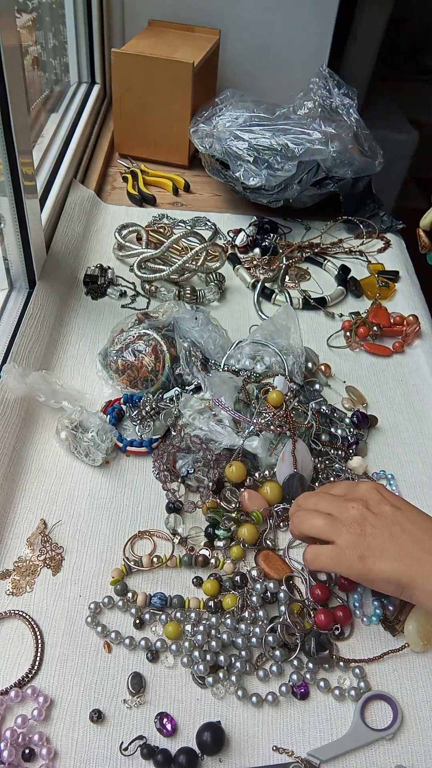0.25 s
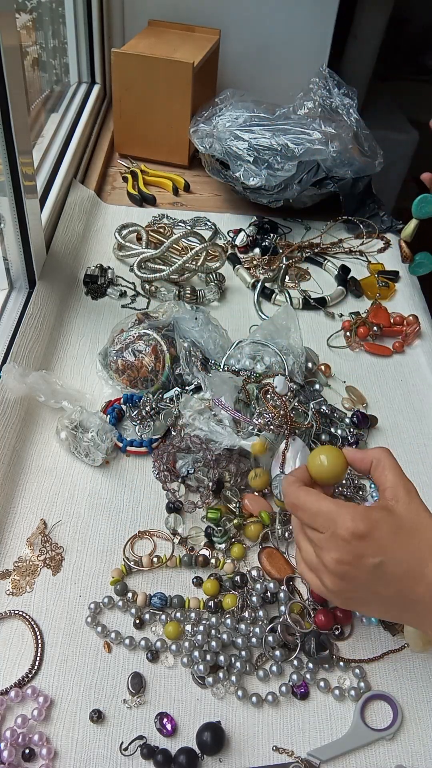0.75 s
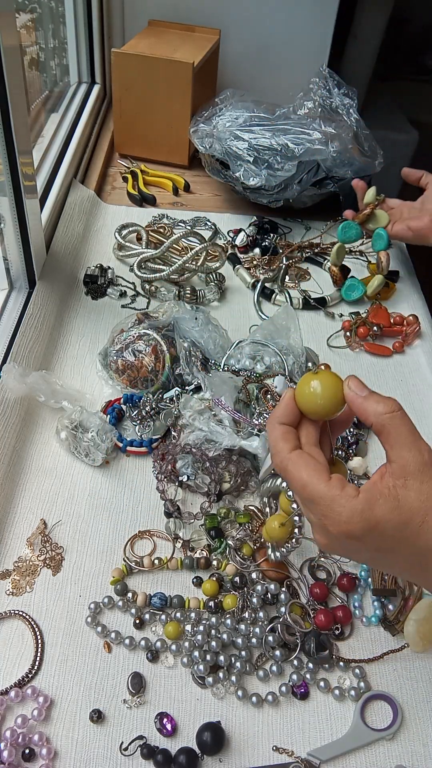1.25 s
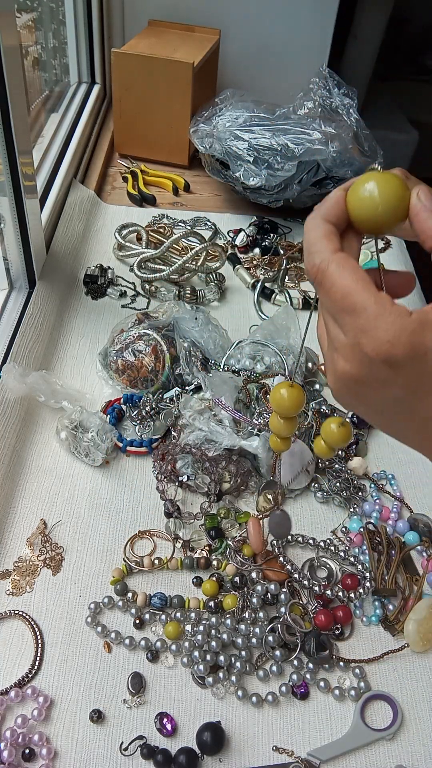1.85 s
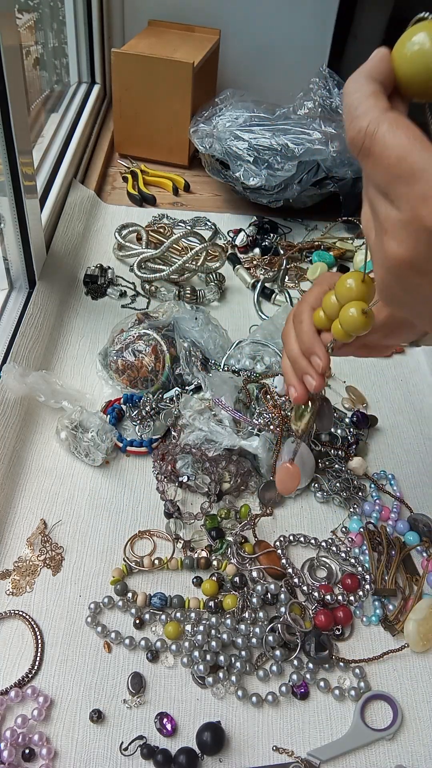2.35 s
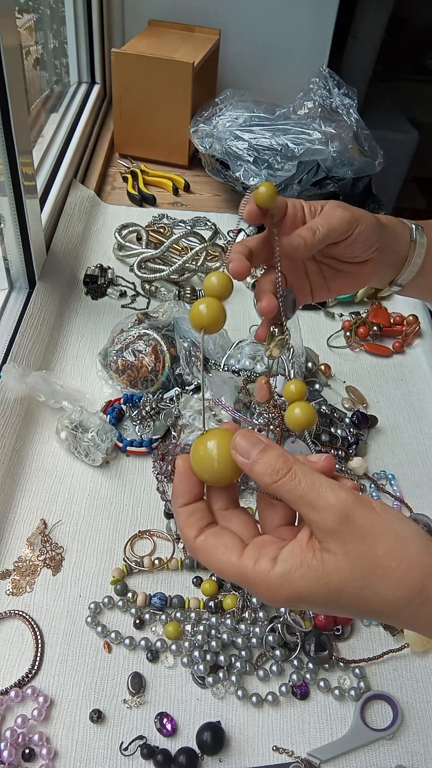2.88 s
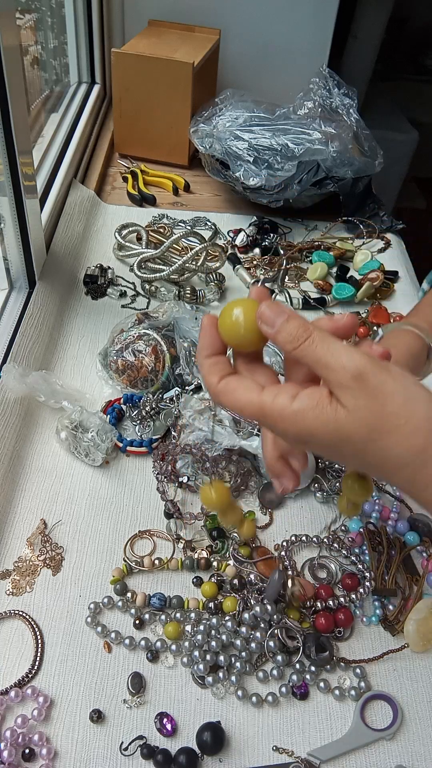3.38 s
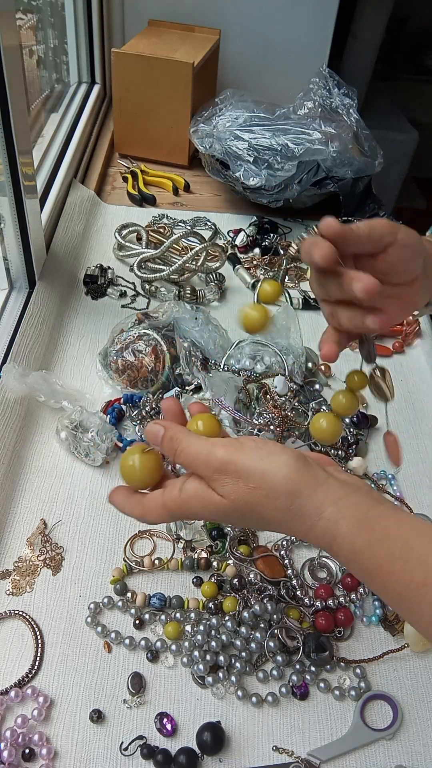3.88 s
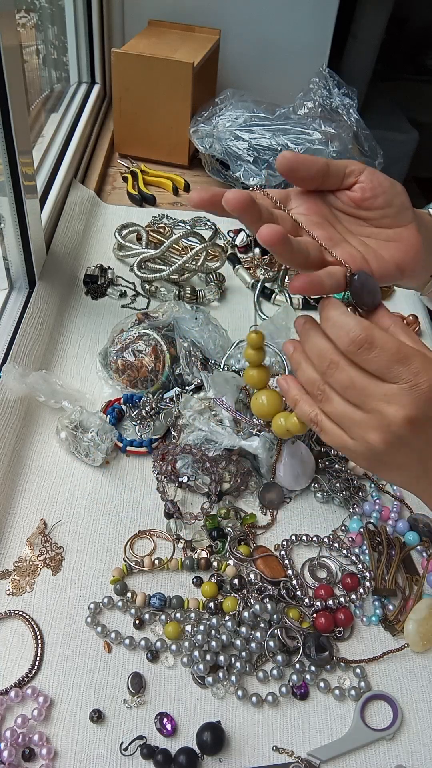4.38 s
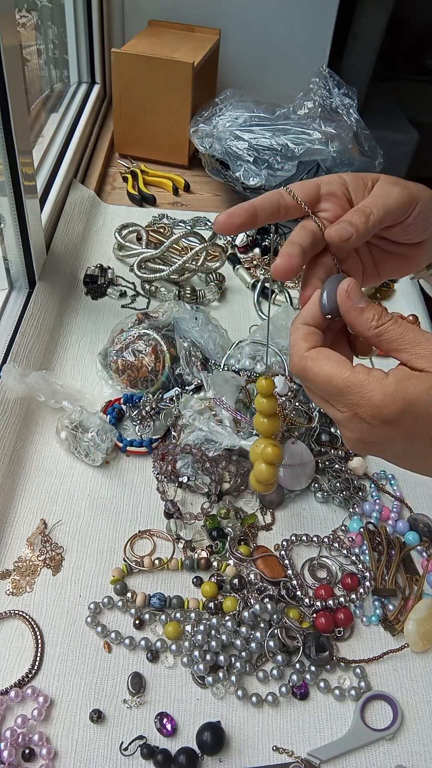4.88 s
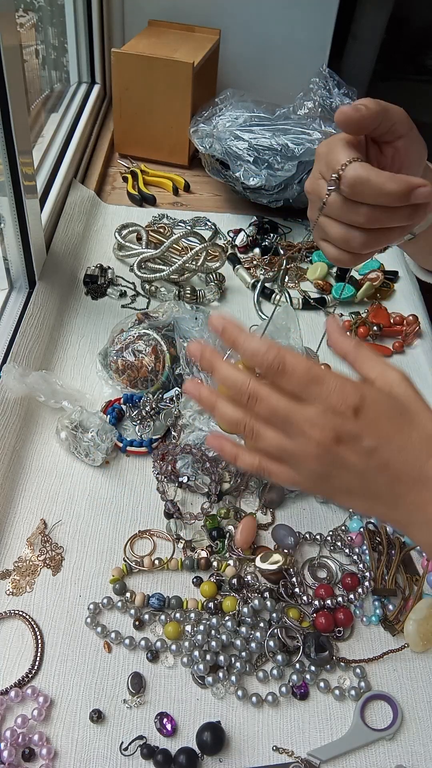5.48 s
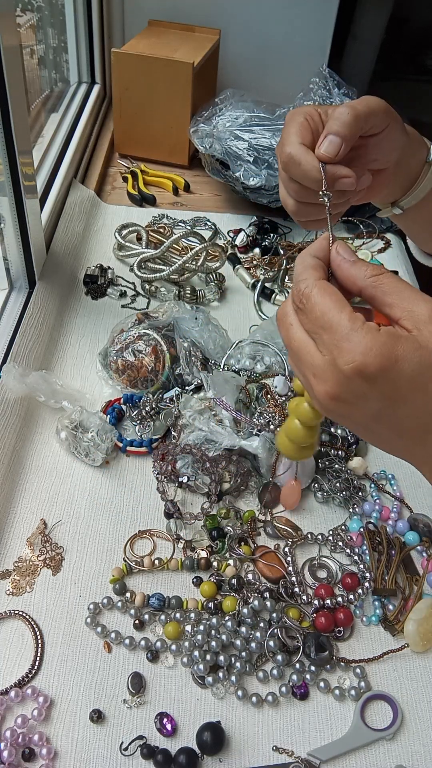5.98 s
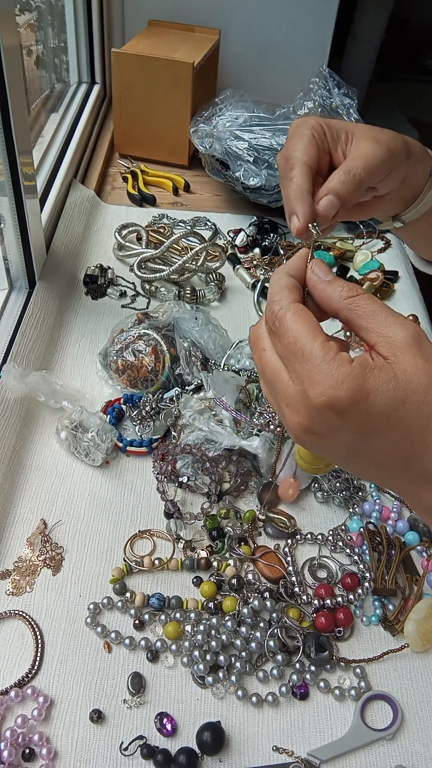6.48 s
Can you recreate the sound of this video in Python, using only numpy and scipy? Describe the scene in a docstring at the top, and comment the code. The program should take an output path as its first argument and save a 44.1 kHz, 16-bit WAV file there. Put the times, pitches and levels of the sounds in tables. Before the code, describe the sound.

Heavy beads and thin chains are handled above a cloth-covered table. After a hushed start and soft thuds, they rattle thickly for about a second, then fall nearly silent. Sharp bright clacks return in three separate bursts, with light ticks between. The sound is close and fairly dry, with short room tails and very faint, noise-suppressed background.

```python
"""A small room with a cloth-covered table: close to a phone, a hand lifts a bead necklace out of jewellery.
Beads click as short sine rings with a noise crack and a treble snap; chains slither as dense link ticks.
Heavy beads knock the table top, made of noise blows that ring its modes; a faint hoot is a gliding sine.
A sparse decaying tail answers for the room, over shaped noise as room tone.
The phone's noise suppressor holds the room tone down and cuts the tails short."""
import sys
import numpy as np
from scipy import signal
from scipy.io import wavfile
from scipy.ndimage import uniform_filter1d

SR = 44100
rng = np.random.default_rng(int(sys.argv[2]) if len(sys.argv) > 2 else 0)


def transcribe(u):
    """Save the signal u as a 16-bit wav file named by the first command-line argument.

    u: samples, shape (n,) or (channels, n), limited to [-1, 1]; the rate is SR.
    q: integer samples, one column per channel.
    """
    v = np.clip(np.atleast_2d(u).T, -1, 1)
    q = np.round(v * 32767).astype(np.int16)
    wavfile.write(sys.argv[1], SR, q)


N = 297234

# clear clicks of bead on bead: (time [s], level [dB], ring pitch [Hz], treble snap against the ring [dB])
BEAD_CLICKS = [(0.612, -38, 2610, -12), (0.6519, -47, 2210, -5), (0.6945, -28, 2790, -22),
               (0.703, -22.5, 3870, -7.5), (0.7493, -31, 3850, -8), (0.8023, -31.5, 1620, -22),
               (0.8098, -24.5, 4280, -14), (0.821, -22, 4030, -13.5), (0.8608, -19.5, 3410, -18),
               (0.8711, -29.5, 3460, -7), (0.8775, -30, 3680, 0.5), (0.9044, -36.5, 3560, -13.5),
               (0.9294, -22.5, 3180, -18.5), (0.9453, -21, 2690, -15), (0.9503, -24.5, 3000, -12.5),
               (0.9624, -23.5, 3800, -15.5), (0.9971, -25.5, 3900, -10), (1.0293, -21.5, 3910, -2),
               (1.1184, -31.5, 2600, -7), (1.1273, -32, 3740, -12), (1.1637, -27.5, 3880, -10),
               (1.169, -19.5, 3350, -12), (1.2141, -35, 2470, -8.5), (1.2216, -19, 4410, -23.5),
               (1.2395, -22, 3730, -18), (1.2824, -29.5, 4300, -4.5), (1.2905, -21.5, 6290, -8),
               (1.297, -24, 6640, -25), (1.3239, -23.5, 4240, -16), (1.3326, -19.5, 4810, -9.5),
               (1.3545, -27.5, 4580, -13.5), (1.3935, -26.5, 4550, -21.5), (1.4144, -26, 4900, -25.5),
               (1.4204, -21, 4690, -31.5), (1.4635, -12, 2490, -23), (1.4758, -18, 2350, -21),
               (1.4814, -19.5, 6280, -24), (1.4874, -23.5, 5460, -21.5), (1.5261, -26.5, 1680, -19),
               (1.5615, -28.5, 3290, -16), (1.5869, -22, 2520, -29.5), (1.6593, -39.5, 2360, -17),
               (1.708, -34.5, 5140, -0.5), (1.718, -28.5, 3670, -1), (1.7308, -29, 1470, -29.5),
               (1.7639, -23, 5530, -12.5), (1.7835, -20.5, 6150, -5), (1.9708, -62.5, 4470, 1),
               (2.0805, -39, 3630, -13), (2.0887, -38, 3720, -22), (2.1545, -63, 3410, -17),
               (2.2004, -63.5, 1726, -12.5), (2.2334, -60.5, 3930, -9.5), (2.2655, -52, 3970, -9.5),
               (2.356, -46, 2160, -20.5), (2.3664, -48, 4380, -31), (2.4363, -52, 5310, -10.5),
               (2.5341, -55.5, 4510, -33), (2.5436, -45, 4480, -31.5), (2.5894, -61, 3030, -19),
               (2.6594, -70.5, 1572, -11.5), (2.7327, -31.5, 5920, -14.5), (2.7386, -37.5, 5080, -12.5),
               (2.9809, -46, 1990, -25), (3.039, -39.5, 2900, -19.5), (3.0453, -36.5, 4590, -12.5),
               (3.0785, -24.5, 3770, -12), (3.1231, -27.5, 3880, -8.5), (3.1339, -9.5, 4390, -13),
               (3.1411, -9, 5790, -21), (3.168, -14.5, 5290, -8.5), (3.1865, -14.5, 5150, -16),
               (3.196, -16.5, 3640, -11), (3.2289, -17, 6620, -10.5), (3.2718, -22, 3590, -16),
               (3.3855, -61, 2200, -7.5), (3.4135, -44.5, 6130, -12), (3.4407, -33, 5740, -19.5),
               (3.4554, -38.5, 5790, -22.5), (3.5058, -24, 4640, -23), (3.534, -34, 5620, -32),
               (3.5411, -42, 6630, -47), (3.6066, -33, 5320, -3), (3.614, -35.5, 6600, -20),
               (3.6413, -45.5, 4260, -19), (3.675, -38, 5670, -18), (3.7907, -45.5, 3080, -30),
               (3.7978, -44.5, 3380, -26), (3.809, -44, 3250, -17.5), (3.8172, -26.5, 4820, -12),
               (3.8282, -27.5, 5310, -14.5), (3.8437, -24, 4730, -20.5), (3.8594, -37, 2980, -8.5),
               (3.8831, -46.5, 3210, -21), (3.9415, -32, 4330, -20.5), (3.9552, -30.5, 4330, -9),
               (3.9747, -34, 4370, -9), (3.9894, -37.5, 4540, -17.5), (4.0878, -23, 3740, -39.5),
               (4.1128, -26, 3250, -36.5), (4.123, -24.5, 4150, -37), (4.1687, -26, 2890, -38),
               (4.1762, -26, 5500, -28), (4.1876, -12.5, 5400, -22), (4.1938, -19.5, 3930, -24.5),
               (4.2158, -17.5, 3160, -43), (4.2322, -32.5, 3290, -10), (4.2627, -23, 4300, -19.5),
               (4.2697, -26.5, 4480, -18), (4.342, -21.5, 4600, -31), (4.3524, -30.5, 4940, -32.5),
               (4.3861, -34.5, 4930, -36), (4.3939, -30.5, 5560, -38.5), (4.4711, -51.5, 3930, -6.5),
               (4.5269, -53.5, 3750, -14), (4.6674, -52.5, 5270, -3.5), (4.6945, -50.5, 3430, -12),
               (4.7107, -44, 4410, -10), (4.7284, -39, 3940, -7.5), (4.7613, -40.5, 3590, -23.5),
               (4.8675, -53, 3790, -25), (4.9001, -51, 2880, -23), (4.91, -45.5, 3580, -23),
               (5.0595, -59, 6050, -20), (5.4336, -13, 2480, -18.5), (5.4477, -32, 2620, -11.5),
               (5.4523, -12, 4900, -22.5), (5.459, -9.5, 4640, -23), (5.47, -21, 4300, -5),
               (5.4733, -17, 6000, -17), (5.4964, -21, 4910, -8), (5.5339, -25.5, 5070, -18.5),
               (5.5594, -26.5, 1460, -21), (5.5957, -40, 4630, -15.5), (5.6134, -43, 3590, -27),
               (5.6484, -46.5, 2185, -32), (5.6994, -45, 3480, -7), (5.7071, -20, 4010, -18.5),
               (5.7148, -39, 3530, -19.5), (5.7491, -48.5, 4610, -7.5), (5.7703, -20, 6850, -8.5),
               (5.7772, -24, 4510, -4), (5.7828, -23, 5070, -17.5), (5.7916, -28, 3800, -14),
               (5.8709, -46, 3750, -21), (6.001, -38.5, 3430, -11.5), (6.0051, -30.5, 3820, -10.5),
               (6.0428, -52, 3930, -18), (6.133, -37, 3850, -9), (6.1509, -34.5, 6860, -3.5),
               (6.1593, -39, 6170, -16), (6.1684, -39.5, 7060, -20), (6.2205, -43, 2920, -22),
               (6.2332, -41, 3500, -26.5), (6.273, -37.5, 3600, -27), (6.2821, -46.5, 5680, -29.5),
               (6.3654, -43, 5680, -16), (6.4954, -51, 3410, -19.5), (6.5384, -30, 3870, -8.5),
               (6.6774, -64, 5110, -1), (6.7242, -41, 4030, -21.5)]
# spectrum of a click's crack: (frequency [Hz], gain [dB])
CRACK_COLOUR = [(900, -49), (1350, -13), (1700, -7.5), (2500, -4.5), (4000, -2.5), (6000, -3.5), (8000, -8),
                (10000, -37.5), (12000, -62.5)]
# spectrum of its treble snap: (frequency [Hz], gain [dB])
SNAP_COLOUR = [(6500, -33.5), (7900, -9.5), (8900, 10.5), (9900, 1.5), (11000, -1), (12000, -13.5),
               (13000, -46.5)]
# spectrum of its very top: (frequency [Hz], gain [dB])
AIR_COLOUR = [(10000, -30), (11500, -8.5), (13000, -7.5), (14200, -7), (15200, 2), (16000, -18.5),
              (16800, -34)]
# modes of a hard pendant that bright clicks set ringing: (frequency [Hz], level [dB], t60 [s])
PENDANT_MODES = [(3800, -2, 0.078), (1910, -12.5, 0.066), (5750, -15.5, .04), (8460, 1.5, 0.04),
                 (11100, -18.5, .03), (15000, -2, .04)]
# the hand digs in the heap: (time [s], sliding level [dB], its treble level [dB], level passed to the table [dB])
DIGGING = [(0.405, -74.5, -79.5, -75), (0.42, -63, -87.5, -58), (0.56, -63.5, -78.5, -58),
           (0.61, -63.5, -71.5, -60), (0.685, -53.5, -63, -60), (0.776, -53.5, -60.5, -63),
           (0.836, -55, -61.5, -60), (0.89, -45.5, -60, -60), (1.124, -56, -60.5, -64),
           (1.24, -51, -56, -60), (1.376, -64.5, -66, -62), (1.436, -54, -54.5, -60),
           (1.546, -47.5, -55.5, -58), (1.636, -62.5, -69.5, -66), (1.7, -62.5, -70.5, -70),
           (1.826, -74, -88, -75), (1.95, -84, -80.5, -90)]
# single chain slides or swings: (start [s], length [s], top level [dB], top level of the treble [dB])
CHAIN_SLIDES = [(0.223, .065, -73.5, -72), (2.043, 0.42, -83.5, -91.5), (3.071, .35, -65.5, -79),
                (3.427, 0.25, -84, -88), (3.791, 0.13, -66, -81.5), (3.922, 0.13, -62, -63.5),
                (4.148, 0.2, -57.5, -65), (4.453, .12, -70, -68), (4.642, 0.17, -65.5, -67.5),
                (4.842, 0.08, -69.5, -84), (4.896, 0.053, -65.5, -73.5), (4.98, 0.17, -79.5, -86),
                (5.474, .22, -61, -77.5), (5.75, .17, -74, -93.5), (6.672, 0.059, -80.5, -76.5)]
# blows on the table top: (time [s], peak [dB], favoured pitch [Hz], hardness [dB], boom level [dB])
TABLE_KNOCKS = [(0.394, -31, 303, -27.5, -28), (0.411, -19.5, 235, -21, -32.5),
                (0.427, -25.5, 373, -15.5, -42.5), (0.457, -31, 360, -12, -30.5),
                (0.8, -31, 383, -10.5, -42.5), (0.865, -34, 346.4, -16, -39.5),
                (0.925, -28.5, 370, 9.5, -40), (0.959, -37.5, 539, -5.5, -55.5),
                (1.166, -32, 372, -19, -67.5), (1.218, -30.5, 343, 9.5, -43), (1.31, -34, 545, 0, -50.5),
                (1.421, -31, 352, -15, -64.5), (1.462, -18.5, 1177, -11.5, -49),
                (1.524, -22.5, 786, -5, -47.5), (1.584, -38.5, 382, -5.5, -59.5),
                (1.69, -38, 363, -31.5, -61), (1.727, -35, 363, -2, -74.5), (1.779, -34.5, 370, -12, -46.5),
                (2.108, -52, 622, -19.5, -66), (2.975, -48.5, 603, -10.5, -74.5),
                (3.072, -42, 611.5, -12, -68), (3.13, -30, 890, -8, -33.5), (3.155, -22, 1020, 9.5, -47.5),
                (3.229, -38.5, 248.5, -11.5, -45), (3.608, -48.5, 359.4, -11, -59.5),
                (4.12, -49.5, 622, 5.5, -73.5), (4.264, -45, 520, -28, -61),
                (4.391, -55.5, 1040, -16, -70.5), (5.432, -22, 376, 0, -37), (5.458, -24, 384, -1.5, -33.5),
                (5.522, -33.5, 267.5, 0.5, -50), (5.557, -31, 393.3, -11.5, -54.5),
                (5.706, -36.5, 388, -10.5, -75.5), (5.789, -51.5, 492, -15, -58.5),
                (5.833, -49, 351, -27.5, -68), (6.26, -45, 301.4, -37, -59),
                (6.292, -50, 268.4, -32.5, -57), (6.321, -54.5, 298, -30, -55),
                (6.717, -53, 355, -26.5, -63)]
# modes of the table top, before each blow's own damping: (frequency [Hz], level [dB], t60 [s])
TABLE_MODES = [(236, 3, 0.88), (288, 1, 0.55), (369, 4, 0.98), (387, -6, 0.33), (483, -3, 0.2),
               (509, 1.5, 0.48), (622, 3.5, 1), (802.5, 2.5, 0.37), (944, -1, 0.11), (1170, 5.5, 0.022)]
# modes of the table frame and the room under it: (frequency [Hz], level [dB], t60 [s])
FRAME_MODES = [(62.4, -8, 0.29), (75, -10, 0.064), (101.7, -0.5, 0.29), (139, 4.5, 0.17), (152, 2, .45),
               (198, -3, 0.55)]
# spectrum that a hard blow wakes: (frequency [Hz], gain [dB])
HARD_COLOUR = [(120, -38.5), (220, -6.5), (500, 3), (1000, 1.5), (1700, 2.5), (3000, -19), (8000, -38)]
# a faint soft hoot, level before a later lift: (time [s], pitch [Hz], level [dB])
HOOT_GLIDE = [(2.172, 512, -76), (2.213, 538, -64), (2.272, 530.6, -58.5), (2.34, 528, -85.5)]
# decay of the room: (frequency [Hz], t60 [s])
ROOM_DECAY = [(100, 0.47), (300, 0.49), (800, 0.46), (2000, 0.21), (5500, 0.18), (10000, 0.14),
              (15000, 0.12)]
# spectrum of the room tone: (frequency [Hz], relative density [dB per Hz])
TONE_COLOUR = [(12, -44.5), (20, -25), (32, -35.5), (52, -16), (102, 2.5), (124, -8.5), (273, -20),
               (351, -20.5), (1020, -25.5), (1840, -31.5), (2180, -32), (2510, -32), (7510, -42),
               (15200, -58), (16500, -57.5)]
# one faint narrow drone in the room tone: (frequency [Hz], width [Hz], rise [dB])
TONE_DRONE = (622, 11, 13)

# room share of a -31 dB click [dB]; louder clicks are nearer and drier [dB per dB]
CLICK_ROOM_DB, NEARER_PER_DB = -4.0, 0.1266
# light touches of hanging beads ring longer [dB of time per dB below the threshold]
RING_T60_S, FREE_BELOW_DB, FREE_RINGS = .006, -38.0, .6
# number of chance clicks; least height over the sliding chains and its spread
SMALL_CLICKS, SMALL_OVER_DB, SMALL_SPREAD_DB = 340, 12.5, 4.5
# their pitch range; snap of the brightest against the treble share of the sliding
SMALL_HZ, SMALL_TREBLE_DB = (2020, 6000), -4.5
# a slide swells early and dies slowly (exponents); share of it that reaches the table
SLIDE_SKEW, SLIDE_POINT, SLIDE_TABLE_DB = 0.77, 2.2, -13.0
# the lifted necklace never hangs quite still
DANGLE_DB, DANGLE_TREBLE_DB, DANGLE_FROM_S = -91, -89, 1.9
# link rings against link cracks: freer in the air than in the heap
DIG_JINGLE_DB, HANG_JINGLE_DB = -5.0, 1.0
# decay time of a blow of hardness -13.5 dB; softer blows last longer [dB of time per dB]
RATTLE_MS, SOFT_SLOWS = 3.5, 0.22
# ring of a -30.5 dB blow; a heavier bead rests on the top and damps it [dB of time per dB]
KNOCK_T60_S, HEAVY_DAMPS = .065, 0.22
# a short hard blow hardly wakes the frame below this pitch [dB an octave per dB of hardness]
DEEP_HZ, HARD_SKIPS = 100, 0.7
# room tone level after full suppression, deepest suppression, upper band limit
TONE_DB, SUPPRESS_DB, EDGE_HZ = -69, 9, 16750


def clicks(rows):
    """Bead clicks: contact noise cracks, the bead rings briefly, treble snaps; returns near and far sound."""
    noise_t, ring_t = np.arange(600) / SR, np.arange(1300) / SR
    onset = np.sin(np.pi / 2 * np.minimum(ring_t / 0.00022, 1)) ** 2
    pendant_hits = np.zeros((2, N))
    noise = rng.standard_normal((len(rows), 2, len(noise_t)))
    layers = np.zeros((2, 4, N))  # near and far; ring, crack, snap and air
    for (s, db, hz, treble_db), (crack, snap) in zip(rows, noise):
        room_db = CLICK_ROOM_DB - NEARER_PER_DB * (db + 31)
        lightness_db = max(FREE_BELOW_DB - db, 0) * (s > DANGLE_FROM_S)
        t60 = min(RING_T60_S * gain_of(FREE_RINGS * lightness_db), .035)
        ring = gain_of(-60 * ring_t / t60) * np.sin(2 * np.pi * hz * ring_t) * onset
        ring *= np.sqrt(RING_T60_S / t60)  # longer rings start softer
        # the pendant answers clicks close to its main pitch, bright ones most
        near_pendant = np.exp(-((hz - PENDANT_MODES[0][0]) / 170) ** 2)
        hit_db = db - 15.0 + 2.0 * min(treble_db + 9.5, 0)
        pendant_hits[:, round(s * SR)] = near_pendant * gain_of(hit_db) * gain_of([0, room_db])
        crack = crack * gain_of(-10.0 - 60 * noise_t / 0.021)
        snap = snap * gain_of(treble_db + 2.5 - 60 * noise_t / 0.01)
        air_db = -9.5 + 0.45 * min(treble_db + 8.5, 0)  # soft contacts lose the very top fastest
        near, far = gain_of([db, db + room_db])
        for k, part in enumerate((ring, crack, snap, snap * gain_of(air_db))):
            add(layers[0, k], s, near * part)
            add(layers[1, k], s, far * part)
    pendant = ringing(PENDANT_MODES, np.arange(SR // 10) / SR, np.ones(len(PENDANT_MODES)))
    layers[:, 0] += signal.oaconvolve(pendant_hits, pendant[None], axes=1)[:, :N]
    layers[1, 3] *= gain_of(-2.0)  # the very top beams and is soaked up by cloth
    layers[1, 0] *= gain_of(-0.5)  # the ring beams less into the room than the crack
    return [ring + colour(crack, CRACK_COLOUR) + colour(snap, SNAP_COLOUR) + colour(air, AIR_COLOUR)
            for ring, crack, snap, air in layers]


def small_clicks(level):
    """Chance clicks, evenly scattered and as loud as the sliding allows, as rows like the clear ones."""
    when, size, pitch, dull = rng.random((SMALL_CLICKS, 4)).T
    s = when * (N - 1) / SR
    body_db, treble_db = 20 * np.log10(level[:2, (s * SR).astype(int)])
    db = body_db + SMALL_OVER_DB - SMALL_SPREAD_DB * np.log(1 - size)
    hz = SMALL_HZ[0] * (SMALL_HZ[1] / SMALL_HZ[0]) ** pitch
    snap_db = treble_db - body_db + SMALL_TREBLE_DB - 12.0 * dull
    return list(zip(s, db, hz, snap_db))


def sliding_level():
    """Gains of the sliding chains, their treble and their drag: digging hand, single slides and dangling."""
    t = np.arange(N) / SR
    s, *columns = np.transpose(DIGGING)
    level = gain_of([np.interp(t, s, db, -120, -120) for db in columns])
    for start, length, db, treble_db in CHAIN_SLIDES:
        span = slice(round(start * SR), round((start + length) * SR))
        progress = np.clip((t[span] - start) / length, 0, 1)
        arch = abs(np.sin(np.pi * progress ** SLIDE_SKEW)) ** SLIDE_POINT
        level[:, span] += gain_of([[db], [treble_db], [db + SLIDE_TABLE_DB]]) * arch
    dangle = gain_of([[DANGLE_DB], [DANGLE_TREBLE_DB], [-120]])
    return level + dangle * (t > DANGLE_FROM_S)


def slither(body, treble, weight):
    """Sliding chains: some 1200 link ticks a second, a few large, each ringing one of 16 link resonators."""
    sizes = gain_of(3.5 * np.minimum(rng.exponential(1, N), 5))
    ticks = sizes * (rng.random(N) < 1200 / SR)
    link = rng.integers(0, 16, N)
    rings = np.zeros(N)
    r = gain_of(-60 / (0.047 * SR))  # pole radius for a t60 of 47 ms
    for k, hz in enumerate(np.geomspace(2200, 7500, 16)):
        poles = [1, -2 * r * np.cos(2 * np.pi * hz / SR), r * r]
        rings += signal.lfilter([1, 0, -1], poles, ticks * (link == k))
    cracks = evened(signal.lfilter([1], [1, -.9], ticks) * rng.standard_normal(N))
    tops = colour(cracks * treble, SNAP_COLOUR) + gain_of(1.5) * colour(cracks * treble, AIR_COLOUR)
    drag = colour(cracks * weight, HARD_COLOUR)  # the heap passes the ticks on to the table
    jingle_db = np.where(np.arange(N) / SR > DANGLE_FROM_S, HANG_JINGLE_DB, DIG_JINGLE_DB)
    jingle = cracks + gain_of(jingle_db) * evened(rings)
    return colour(jingle * body, CRACK_COLOUR) + tops + drag


def knocks():
    """Table knocks: a rattling blow rings the top's modes and a dense blur, most near the favoured pitch."""
    out, t = np.zeros(N), np.arange(SR // 3) / SR
    short = t[:SR // 6]
    grid = np.geomspace(20, 20000, 90)
    frame_hz = np.array(FRAME_MODES)[:, 0]
    octaves_deep = np.minimum(np.log2(frame_hz / DEEP_HZ), 0)
    chance = rng.standard_normal((len(TABLE_KNOCKS), 2, len(t)))
    for (s, peak_db, spot_hz, hard_db, boom_db), (rough, blur) in zip(TABLE_KNOCKS, chance):
        ms = RATTLE_MS * gain_of(-SOFT_SLOWS * (hard_db + 13.5))
        t60 = KNOCK_T60_S * gain_of(-HEAVY_DAMPS * (peak_db + 30.5))
        u = t[:3000] * 1000 / max(ms, .3)  # time in decay lengths of the blow
        blow = rough[:len(u)] * np.minimum(5.8 * u, 1) * np.exp(-u)
        # each blow draws the signs of its modes by chance
        top = ringing(TABLE_MODES, short, np.sign(blur)) + gain_of(16.0) * blur[:len(short)]
        top = top * gain_of(-60 * short / max(t60, .02))
        favour = np.exp(-(np.log2(grid / spot_hz) / 0.4) ** 2)
        favour += gain_of(hard_db + 4.0 + read(HARD_COLOUR, grid))
        favour_points = np.transpose([grid, 20 * np.log10(favour)])
        sound = colour(signal.oaconvolve(top, blow), favour_points, size=4096)
        add(out, s, gain_of(peak_db) * sound / abs(sound).max())
        woken = gain_of(HARD_SKIPS * max(hard_db + 26, 0) * octaves_deep)
        boom = ringing(FRAME_MODES, t, woken * np.sign(rough[:len(FRAME_MODES)]))
        boom = boom * (1 - np.exp(-t / 0.0041))  # the heavy frame is slow to start
        fade = np.cos(np.pi / 2 * t / t[-1])
        add(out, s, gain_of(boom_db) * fade * boom / abs(boom).max())
    return out


def hoot():
    """A soft hoot: one sine whose pitch and level glide between points."""
    s, hz, db = np.transpose(HOOT_GLIDE)
    t = np.arange(N) / SR
    phase = 2 * np.pi * np.cumsum(np.interp(t, s, hz)) / SR
    return np.sqrt(2) * gain_of(np.interp(t, s, db, -120, -120)) * np.sin(phase)


def room(x):
    """Room echo of sparse taps, each band dying at its own speed.

    Three random tails crossfade steadily, nine turns a second, so the echo keeps varying."""
    taps = np.zeros((3, SR // 2))
    starts = np.arange(120, SR // 2 - 20, 12)
    at = starts + rng.integers(0, 12, (3, len(starts)))
    np.put_along_axis(taps, at, rng.choice([-1., 1.], at.shape), 1)
    hz, t, z = signal.stft(taps, SR, nperseg=256)
    decay = gain_of(-60 * t / read(ROOM_DECAY, hz)[:, None])
    tails = signal.istft(z * decay, SR, nperseg=256)[1]
    cycles = 9 * np.arange(N) / SR + np.arange(3)[:, None] / 3  # 9 Hz, a third of a turn apart
    turns = np.sqrt(2 / 3) * np.cos(2 * np.pi * cycles)
    return signal.oaconvolve(x * turns, tails / np.linalg.norm(tails[0]), axes=1).sum(0)[:N]


def room_tone():
    """Room tone: steady shaped noise with drifting patches and a narrow drone, set ahead of the suppressor."""
    frames, hz = N // 512 + 5, np.fft.rfftfreq(2048, 1 / SR)
    a, b, patches = rng.standard_normal((frames, 1025, 3)).T
    patches = evened(uniform_filter1d(uniform_filter1d(patches, 6, 0), 5, 1))
    drone_hz, width_hz, rise_db = TONE_DRONE
    drone_db = rise_db * np.exp(-((hz - drone_hz) / width_hz) ** 2)
    tone_db = (read(TONE_COLOUR, hz) + drone_db)[:, None] + 2.5 * patches
    noise = signal.istft((a + 1j * b) * gain_of(tone_db), nperseg=2048, noverlap=1536)[1][:N]
    return gain_of(TONE_DB + SUPPRESS_DB) * evened(noise)


def ringing(modes, t, signs):
    """Dying sines, one a mode, each with the sign (or signed weight) given."""
    hz, db, t60 = np.array(modes).T[:, :, None]
    return (signs[:len(modes), None] * gain_of(db - 60 * t / t60) * np.sin(2 * np.pi * hz * t)).sum(0)


def colour(x, points, size=1024):
    """Causal filter of unit energy: the phase follows from the log gain."""
    log_gain = np.log(gain_of(read(points, abs(np.fft.fftfreq(size, 1 / SR)))))
    taps = np.fft.ifft(np.exp(np.conj(signal.hilbert(log_gain)))).real[:size // 2]
    return signal.oaconvolve(x, taps / np.linalg.norm(taps))[:N]


def read(points, hz):
    """Read a curve over log frequency."""
    f, value = np.transpose(points)
    return np.interp(np.log(hz + 1), np.log(f + 1), value)


def gain_of(db):
    """Amplitude gain of a level in dB."""
    return 10 ** (np.asarray(db) / 20)


def evened(x):
    """Scale to an RMS of one."""
    return x / np.sqrt(np.mean(x ** 2) + 1e-20)


def add(mix, s, sound):
    """Lay a sound into the mix at time s, cut at the end."""
    part = mix[round(s * SR):][:len(sound)]
    part += sound[:len(part)]


def scene():
    """Mix the necklace, the table, the room's answer, the hoot and the room tone."""
    level = sliding_level()
    near, far = clicks(list(BEAD_CLICKS) + small_clicks(level))
    chains, table = slither(*level), knocks()
    wet = room(far + gain_of(-10.0) * chains + gain_of(-5.0) * table)
    lifted_hoot = gain_of(SUPPRESS_DB / 2) * hoot()  # makes up for part of the suppression
    return (near + chains + table + wet + lifted_hoot + room_tone())[None]


def record(dry):
    """The suppressor lowers every band that stands little above its own quiet level; then the band limit."""
    z = signal.stft(dry[0], nperseg=256, noverlap=192)[2]
    power = uniform_filter1d(uniform_filter1d(abs(z) ** 2, size=5, axis=0), size=9, axis=1)
    level_db = 10 * np.log10(abs(power) + 1e-16)
    over_db = level_db - np.percentile(level_db, 15, axis=1)[:, None]
    opening = np.clip((over_db - 4.0) / 20.5, 0, 1)  # 0 held down, 1 fully open
    held = z * gain_of(SUPPRESS_DB * (opening - 1))
    cleaned = signal.istft(held, nperseg=256, noverlap=192)[1][:N]
    band_limit = signal.firwin(511, EDGE_HZ, window=("kaiser", 9), fs=SR)
    return signal.oaconvolve(cleaned, band_limit, "same")[None]


dry = scene()
out = record(dry)
transcribe(out)
```